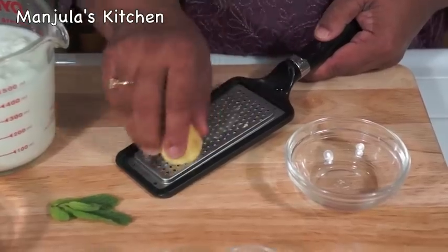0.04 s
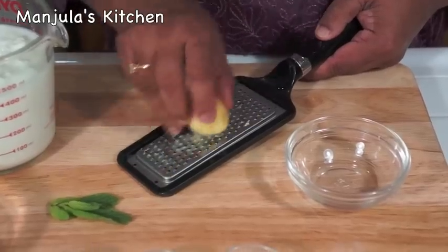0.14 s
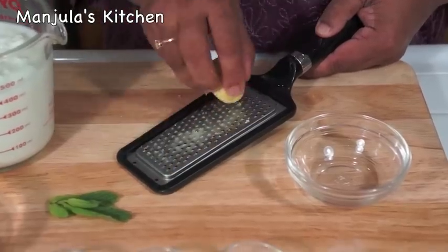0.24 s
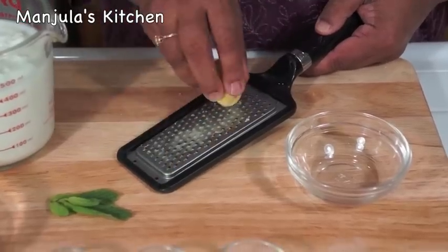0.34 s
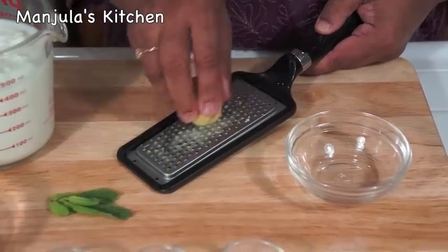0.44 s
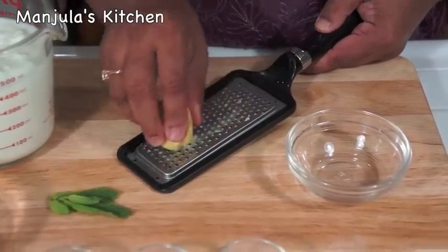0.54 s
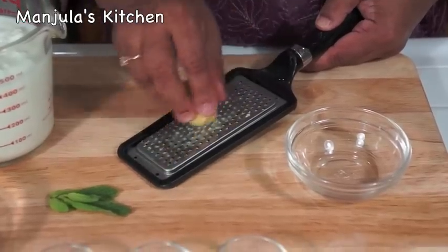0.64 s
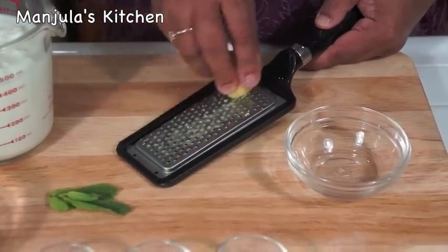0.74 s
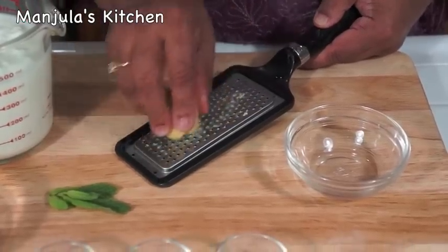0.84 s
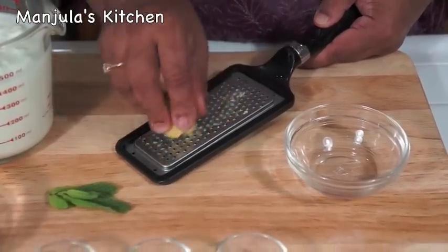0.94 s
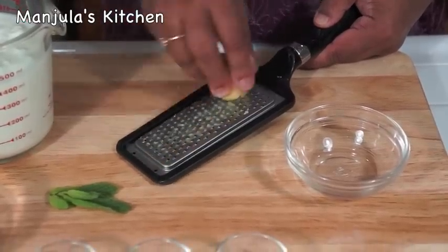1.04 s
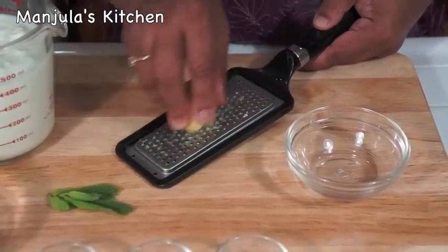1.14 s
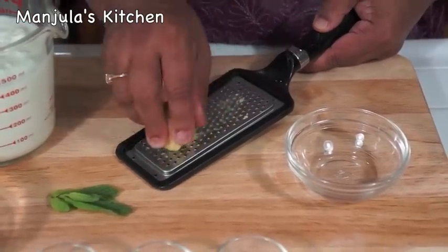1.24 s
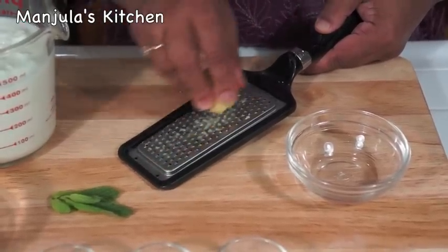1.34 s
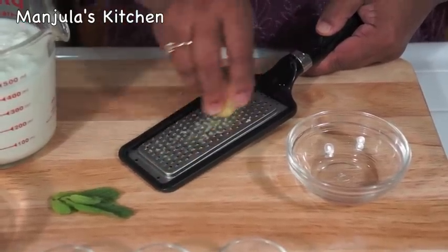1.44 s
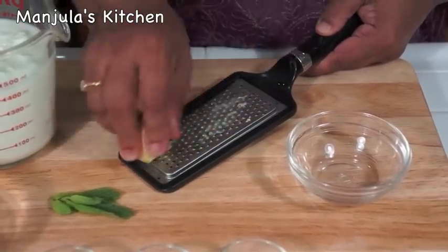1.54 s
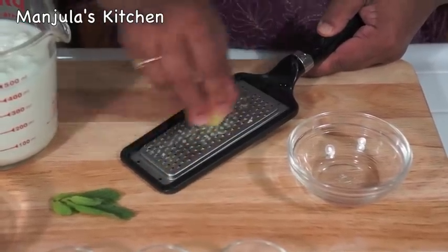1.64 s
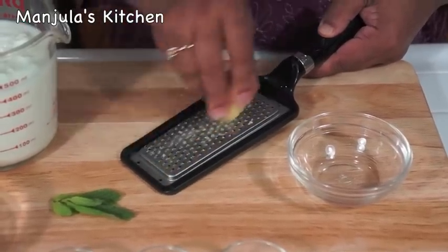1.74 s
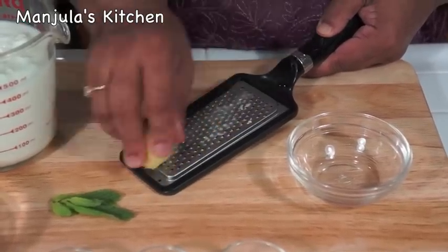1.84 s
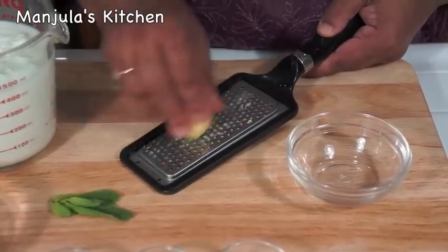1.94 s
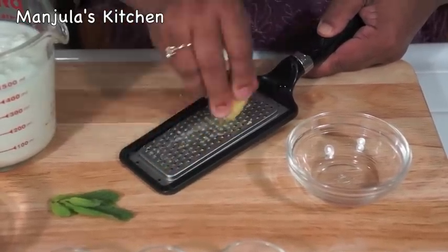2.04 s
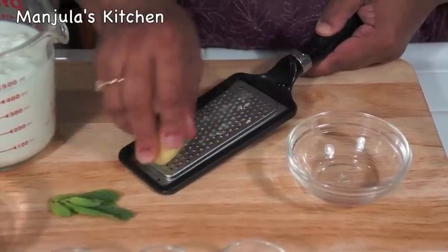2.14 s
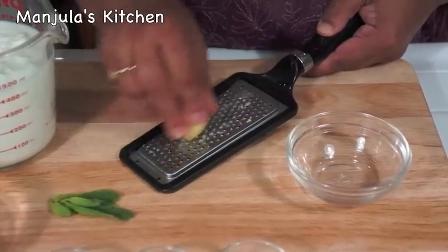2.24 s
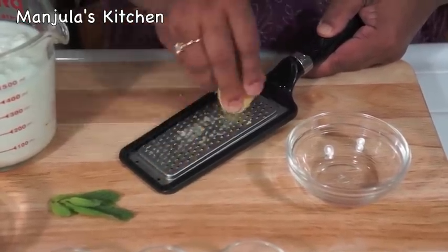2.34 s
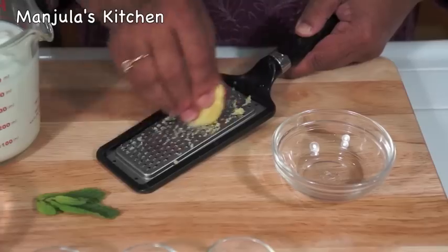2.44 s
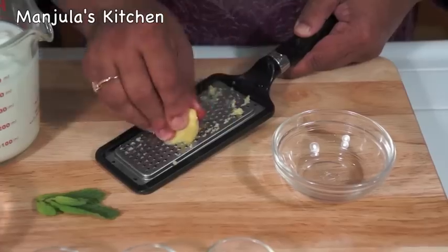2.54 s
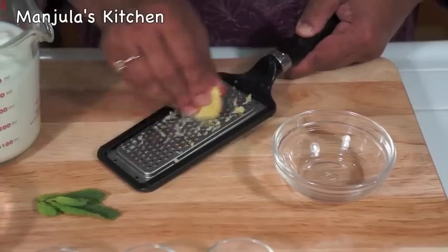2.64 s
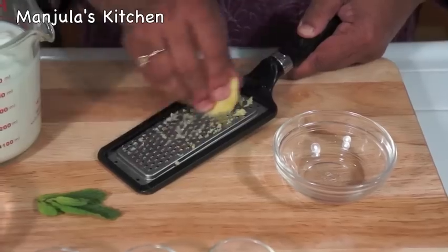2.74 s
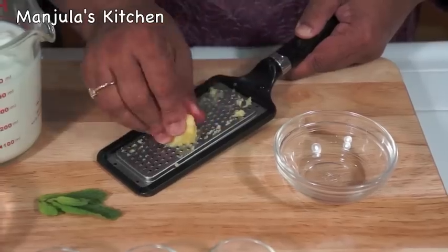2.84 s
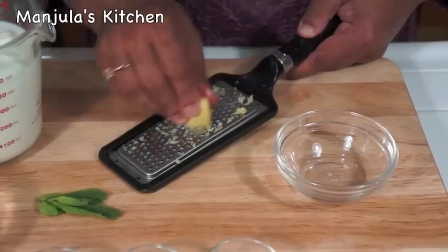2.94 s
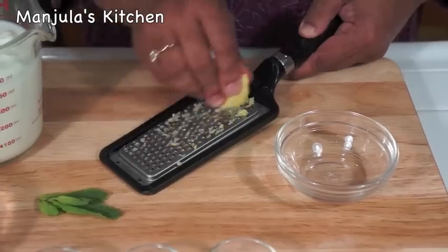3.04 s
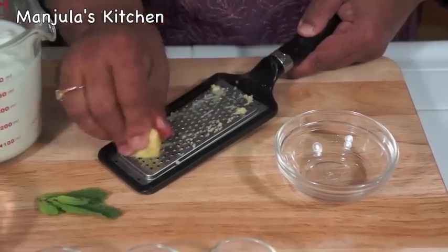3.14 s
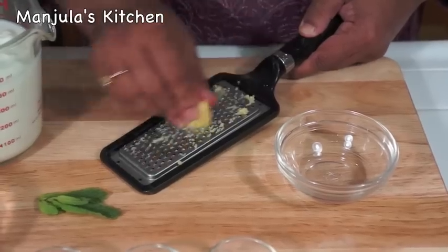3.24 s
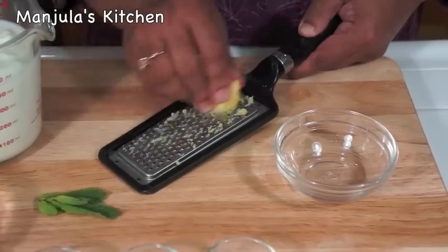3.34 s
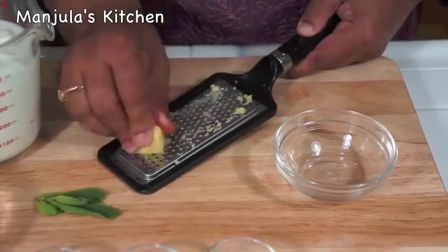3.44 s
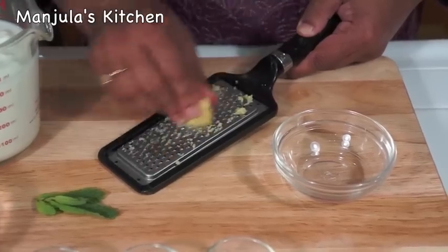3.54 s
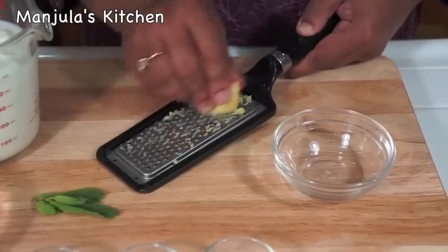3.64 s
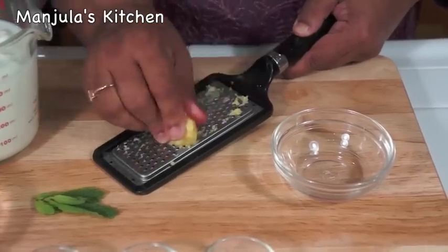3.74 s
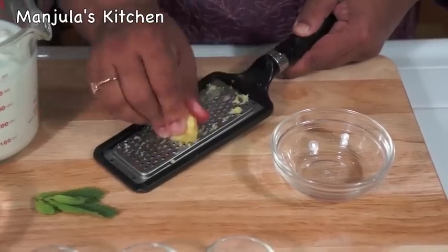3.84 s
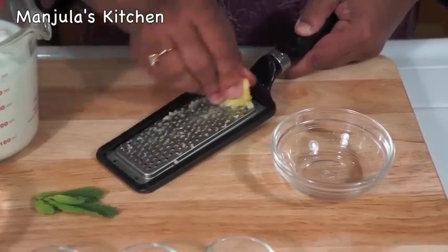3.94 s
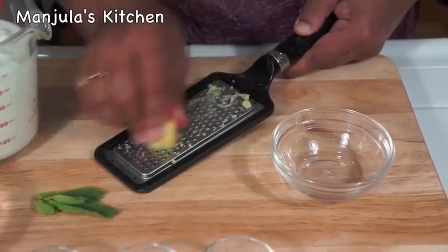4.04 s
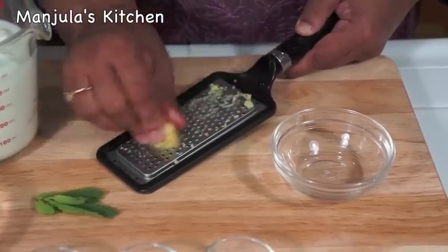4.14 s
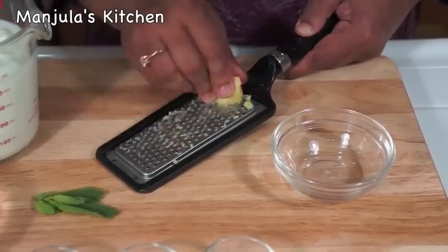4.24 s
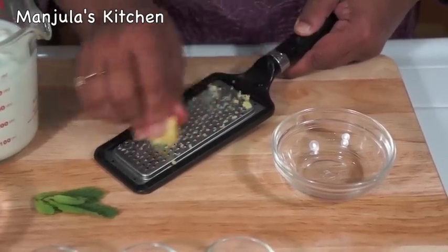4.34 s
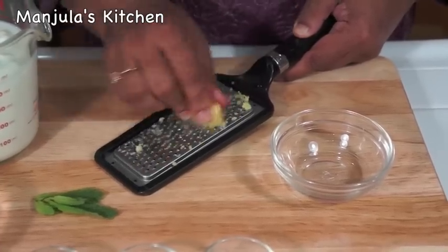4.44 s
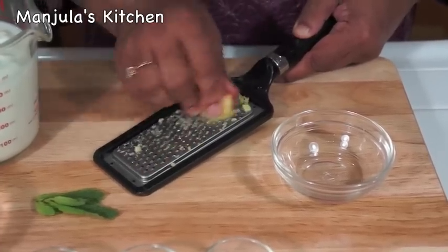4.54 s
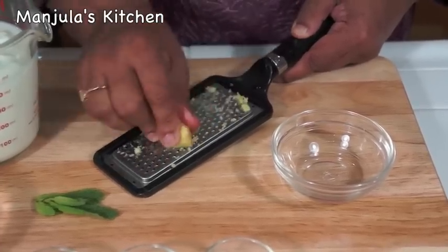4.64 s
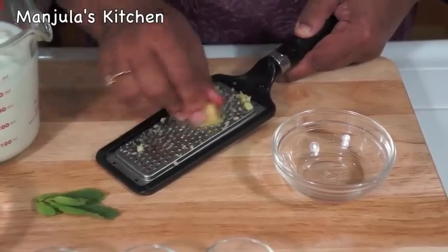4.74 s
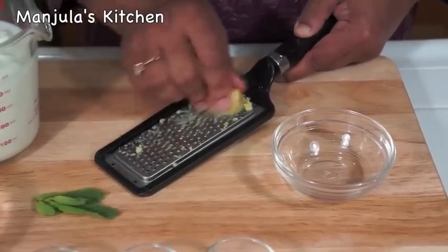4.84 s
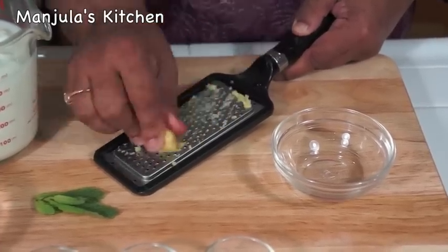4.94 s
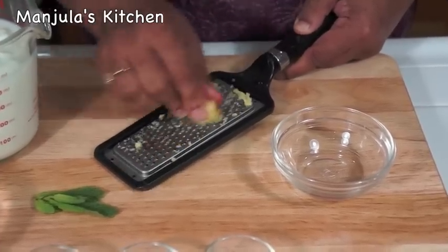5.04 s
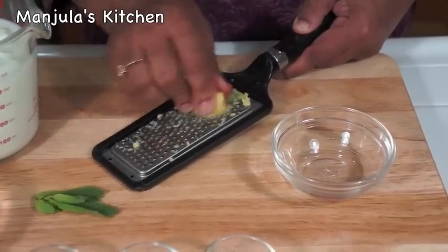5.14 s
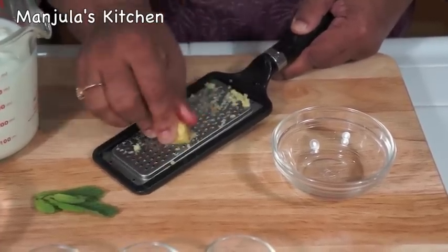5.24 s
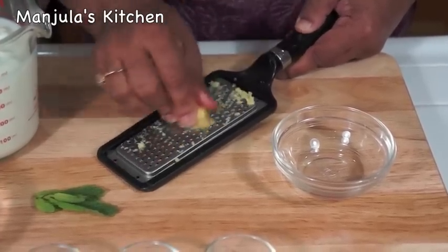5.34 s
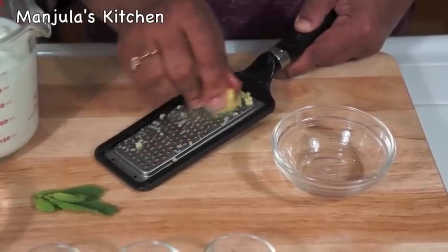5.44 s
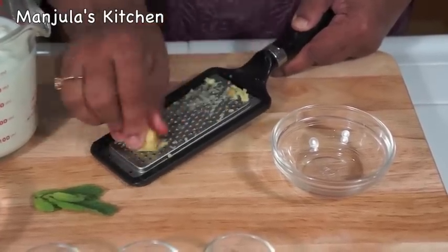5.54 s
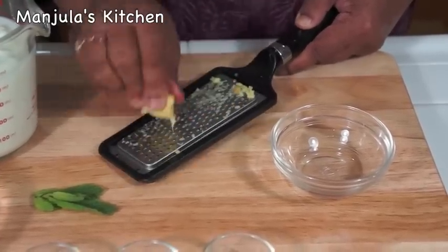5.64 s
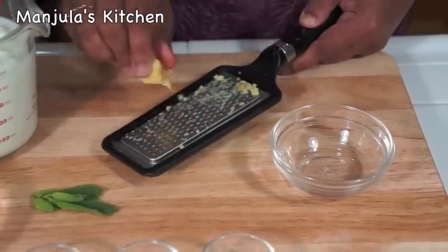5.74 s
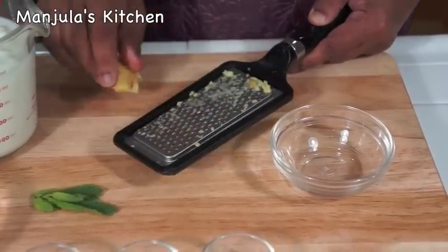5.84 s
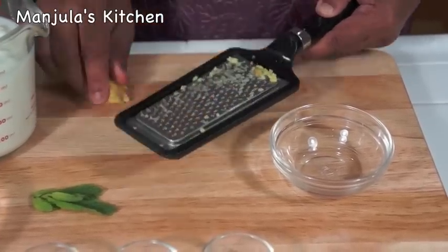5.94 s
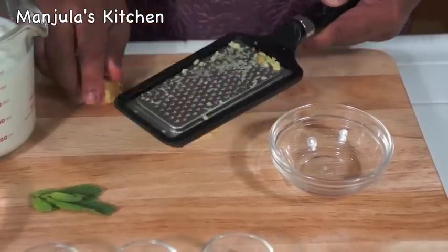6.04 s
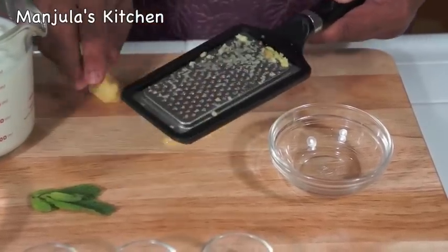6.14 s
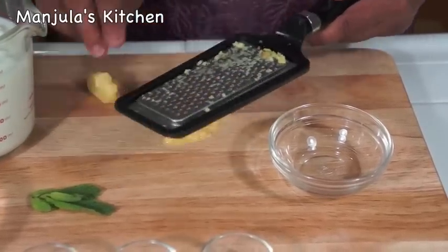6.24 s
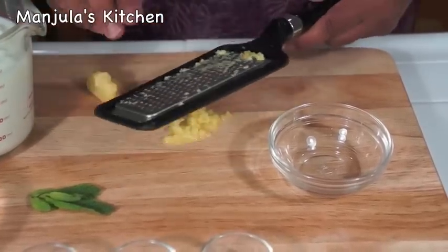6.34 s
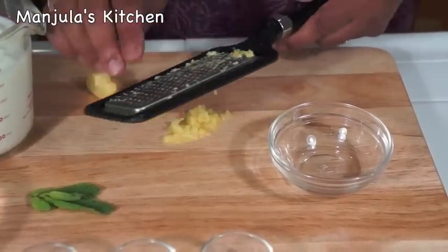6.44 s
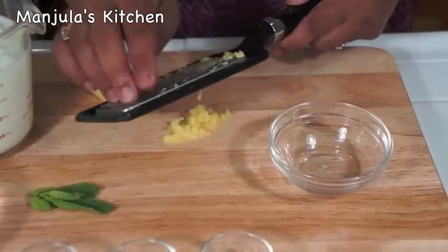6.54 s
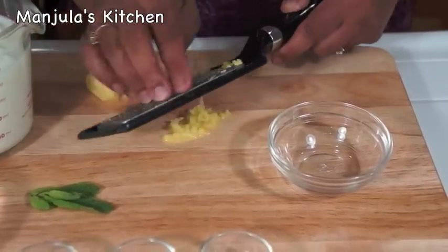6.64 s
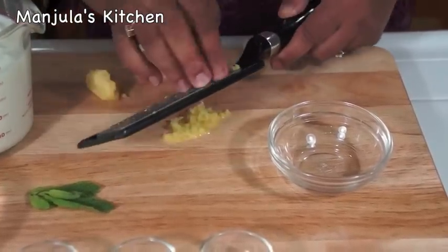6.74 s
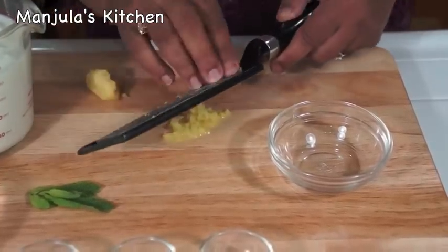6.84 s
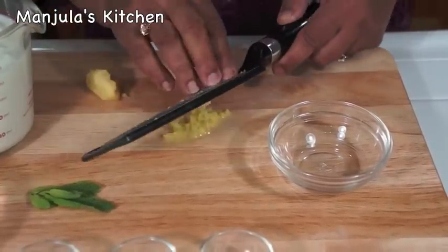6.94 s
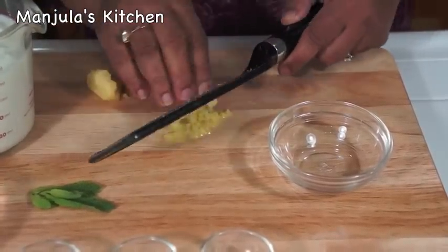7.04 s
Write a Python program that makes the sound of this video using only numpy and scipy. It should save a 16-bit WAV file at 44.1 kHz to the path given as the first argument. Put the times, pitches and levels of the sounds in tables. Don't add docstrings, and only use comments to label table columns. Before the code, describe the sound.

Brisk, bright metallic scrapes of a fibrous root on a fine grater, about three pushes a second, ending in a clatter, soft bumps and finger ticks.

```python
import sys
import numpy as np
from scipy import signal
from scipy.fft import rfft, irfft, next_fast_len
from scipy.io import wavfile
from scipy.ndimage import uniform_filter1d

SR = 44100
rng = np.random.default_rng(int(sys.argv[2]) if len(sys.argv) > 2 else 0)


def boost(x):
    u = np.asarray(x, float) / 20
    return 10 ** u


def file_out(sig):
    cols = np.atleast_2d(sig).T
    lim = np.clip(cols, -1, 1)
    pcm = np.round(lim * 32767).astype(np.int16)
    wavfile.write(sys.argv[1], SR, pcm)


N = 312326
T = np.arange(N) / SR
MIC_SIGNS = np.array([[1], [-1]])

# hz, width_hz, level_db
FRAME = [(436, 73, -15.5), (504.7, 14.6, -3.5), (622, 17, -16.5), (711, 26, -5), (731, 12, -3.5),
         (823, 22.6, 0.5), (900, 12, -10.5), (991, 38, -6)]
# hz, width_hz, level_db
HANDLE = [(1100, 22, 1.5), (1198, 56, 0), (1285, 82, 3.5), (1374, 82, 4), (1466, 29, -2), (1700, 100, -17)]
# centre_s, half_length_s, depth_db
JOINS = [
    (2.486, 0.078, -21),
    (4.457, 0.11, -28.5),
]
# start_s, tearing_db
LANDINGS = [
    (0.069, -37),
    (1.42, -28.5),
    (2.031, -29),
    (2.328, -29),
    (5.518, -31.5),
]


def level(x, db):
    return x * boost(db) / np.sqrt(np.mean(x ** 2))


def colour(x, points):
    hz, db = np.transpose(points)
    size = next_fast_len(N)
    f = np.maximum(np.arange(size // 2 + 1) * SR / size, 1)
    gain = boost(np.interp(np.log(f), np.log(hz), db))
    return irfft(rfft(x, size) * gain, size)[..., :N]


def band(x, lo_hz, hi_hz):
    sos = signal.butter(2, [lo_hz, min(hi_hz, SR / 2.2)], "band", fs=SR, output="sos")
    return signal.sosfilt(sos, x)


def walk(rate_hz, every=1):
    knots = rng.standard_normal(int(T[-1] * rate_hz) + 2)
    return np.interp(T[::every] * rate_hz, np.arange(len(knots)), knots) * 5 / 4


def ring(x, modes, shift_db=0., rate_hz=1, press_db=None):
    out = 0
    for k, (hz, width_hz, db) in enumerate(modes):
        gain = boost(db)
        if shift_db:
            press = 0 if press_db is None else press_db[k]
            gain = np.repeat(boost(db + shift_db * walk(rate_hz, 16) + press), 16)[:N]
        r = np.exp(-np.pi * width_hz / SR)
        poles = [1, -2 * r * np.cos(2 * np.pi * hz / SR), r * r]
        out = out + (-1) ** k * (1 - r) * signal.lfilter([1, 0, -1], poles, x * gain)
    return out


def fibres(share, spread_db, judder_db, judder_hz):
    size_db = spread_db * rng.exponential(size=N).clip(0, 6)
    snaps = (rng.random(N) < share) * rng.standard_normal(N) * boost(size_db)
    return level(snaps * boost(judder_db * walk(judder_hz)), 0)


def bursts(times_s, peaks_db, decay_s, rise_s, hz=None):
    out, age = np.zeros(N + 6000), np.arange(6000) / SR
    for k, (s, db) in enumerate(zip(times_s, peaks_db)):
        shape = boost(db) * (1 - np.exp(-age / rise_s)) * np.exp(-age / decay_s)
        if hz is not None:
            shape = shape * np.sin(2 * np.pi * hz[k] * age)
        out[int(s * SR):int(s * SR) + 6000] += shape
    return out[:N]


def strokes(start_s, rise_s, hold_s, db, fall_db_s, onset, sag_db_s=0.):
    age = T[::32, None] - start_s
    held = np.clip(age - rise_s, 0, None)
    fall_db = sag_db_s * held + fall_db_s * np.clip(held - hold_s, 0, None)
    shape = np.clip(age / rise_s, 0, 1) ** onset * boost(db - fall_db)
    return np.interp(T, T[::32], np.sum(shape ** 2, axis=1))


def in_db(power):
    return 10 * np.log10(power + 1e-13)


def kitchen(tear_db):
    # hz, density_db
    hush_points = [(15, -45), (25, -30), (64, -25), (125, -11), (158, -15), (307, -2.5), (511, -5),
                   (945, -6), (1580, -7.5), (4270, -13), (5250, -13.5), (9450, -13.5), (11300, -24),
                   (14700, -58), (22000, -120)]
    # hz, drift_hz, flutter_hz, level_db, end_s
    whines = [
        (9630, 51, 60, -75.5, 7.4),
        (4300, 24, 100, -72, 6.4),
    ]
    # time_s, level_db, offset_hz
    whine_swell = [(0, 1, 0.5), (1.2, 4, 5.5), (5.72, 3, 60.5), (5.799, 3, -120), (5.86, -7, 1),
                   (5.92, 1, 99), (6.0, 0, -40), (6.06, -14, -4), (6.14, 3, 40), (6.22, -5, -30),
                   (6.3, -4, -62), (6.4, -2, 60)]

    mid, side = (colour(rng.standard_normal(N), hush_points) for _ in range(2))
    apart = 0.39 * side + 0.36 * band(side, 510, 18000)
    out = level(mid + apart * MIC_SIGNS, -66)

    s, db = np.transpose(LANDINGS[1:4])
    out = out + bursts(s, db - 36, 0.019, 0.0037, np.full(len(s), 75))
    push_db = uniform_filter1d(tear_db.clip(-70), int(0.059 * SR))
    out = out + level(band(rng.standard_normal(N), 63, 165), -65.5) * boost(0.41 * push_db)

    s, swell_db, off_hz = np.transpose(whine_swell)
    for hz, drift_hz, flutter_hz, db, end_s in whines:
        lower = hz < 5000
        pitch_hz = hz + lower * np.interp(T, s, off_hz) + drift_hz * walk(6.2) + flutter_hz * walk(600)
        whine = np.sin(2 * np.pi * np.cumsum(pitch_hz) / SR)
        whine_db = db + 1.7 * walk(17) - 40 * np.clip(T - end_s, 0, None)
        out = out + whine * boost(whine_db + lower * np.interp(T, s, swell_db))
    return out


def walls(x, t60_s, treble_db):
    age = np.arange(SR // 2) / SR
    echo = boost(-60 * age / t60_s) * (age > .003) * rng.standard_normal((2, len(age)))
    echo = echo.mean(axis=0) + boost(treble_db) * band(echo, 730, 16500)
    return signal.fftconvolve(x[None], echo, axes=1)[:, :N]


def set_down():
    # start_s, peak_db, pitch_hz, click_rel_db
    bump_table = [(5.95, -66, 400, -8), (5.967, -51, 540, -20), (5.979, -60, 566, 4), (6.005, -65, 622, 5),
                  (6.04, -64, 380, -16), (6.07, -67, 610, -8), (6.137, -57, 606, -11),
                  (6.147, -63, 480, -8), (6.164, -66, 645, -13), (6.209, -65, 400, -8),
                  (6.285, -72, 1100, 0)]
    noise = rng.standard_normal((2, N))
    s, db, hz, click_db = np.transpose(bump_table)
    click = bursts(s, db + click_db + 11, 0.0068, .0004) * band(noise[1], 1000, 1600)
    knock = bursts(s, db + 2.0, 0.017, 0.0006, hz) + bursts(s, db - 4, 0.012, 0.0015, hz * 0.78)
    wood = bursts(s, db + 10.5, 0.022, 0.0012) * band(noise[0], 300, 640)
    return click + knock + wood


def wiping():
    # start_s, rise_s, hold_s, level_db, low_rel_db
    wipe_table = [(6.36, .08, .01, -68, -7), (6.635, 0.027, .01, -68, -3), (6.688, .006, 0.017, -66, 2),
                  (6.74, .008, .01, -63.5, -3), (6.886, 0.0063, .004, -58, -3),
                  (6.935, .003, .003, -53, -12), (6.953, .003, .012, -51, -10),
                  (6.97, .004, 0.026, -61, -0.5), (7.005, 0.022, 0.018, -55, -12),
                  (7.035, 0.0037, 0.012, -52.5, -23), (7.055, .01, .03, -65, -18)]
    s, rise, hold, db, low_db = np.transpose(wipe_table)
    slide_db, low_db = (in_db(strokes(s, rise, hold, d, 258, 1.2)) for d in (db, db + low_db))
    return slide_db, low_db - slide_db


def fingers():
    # start_s, peak_db, low_rel_db, ring_hz, low_ring_hz
    tick_table = [(6.6927, -53, -2, 4700, 1600), (6.6958, -48.5, -7, 5070, 1950),
                  (6.701, -61, 2, 3180, 1900), (6.722, -60, -20, 5100, 1900), (6.735, -54, -12, 7050, 2550),
                  (6.7401, -53, 6, 5150, 2550), (6.743, -53, 2, 3820, 1140), (6.898, -55, -8, 9000, 1820),
                  (6.992, -54, -14, 7000, 1900), (6.8912, -45, -16, 6400, 1790),
                  (6.94, -42, -18, 7040, 2700), (6.9472, -46, -22, 8500, 2370),
                  (6.958, -42.5, -11, 6700, 1760), (6.965, -49, -11, 6850, 1900),
                  (6.986, -41, -3, 7100, 1830), (7.0437, -52, 0, 8600, 3560)]
    # hz, width_hz, level_db
    lifted = [(1830, 70, 2), (2550, 81, 2), (5150, 120, -4), (6400, 91, 0), (7050, 140, -9),
              (7400, 130, -1), (8400, 280, -2), (8900, 120, -12)]
    noise = rng.standard_normal((2, N))
    s, db, low_db, hz, low_hz = np.transpose(tick_table)
    ticks = bursts(s, db + 8.5, 0.00091, .0001) * band(noise[1], 1900, 7800)
    ticks = ticks + bursts(s, db - 4.5, 0.0038, .0002, hz)
    ticks = ticks + bursts(s, db + low_db - 4, 0.0091, 0.00036, low_hz) * (.9 + 0.3 * walk(400))
    ticks = ticks + ring(bursts(s, db, 0.0013, .0002) * noise[0], lifted)
    ticks = ticks + bursts([7.043], [-36], .03, .002) * band(noise[1], 6000, 6350)
    ticks = ticks + bursts([6.72, 6.739], [-59, -56], 0.0069, 0.0018, [5100, 5150])

    slide_db, low_db = wiping()
    skin = fibres(0.37, 1.5, 2.4, 100)
    bright = level(ring(skin, lifted[2:], 3.5, 25), -9) + level(band(skin, 5900, 8700), -1.5)
    low = level(band(skin, 1070, 3600), -1.6) + level(ring(skin, lifted[:2]), -2.6)
    return ticks + boost(slide_db) * (bright + boost(low_db) * low)


def rattles():
    # start_s, peak_db, click_rel_db, clack_hz, tail_rel_db
    rattle_table = [(5.616, -36, -2, 1230, -11), (5.6306, -25, -2, 1330, -14.5),
                    (5.647, -40, -11, 1390, -12), (5.668, -45, -9, 1356, -19), (5.683, -46, -6, 1340, -18),
                    (5.703, -45, -6, 1405, -12), (5.737, -46, -8, 1330, -11), (5.756, -47, -14, 1290, -19),
                    (5.804, -49, -5, 1000, -10), (5.812, -50, -8, 1350, -9.5)]
    s, db, click_db, hz, tail_db = np.transpose(rattle_table)
    noise = rng.standard_normal((2, N))
    clack = bursts(s - .001, db + 5, 0.0022, 0.00088, hz)
    click = bursts(s - .001, db + click_db + 6.5, 0.0032, 0.00042)
    click = click * band(band(noise[0], 470, 2300), 300, 3300)
    tail = bursts(s, db + tail_db, 0.025, 0.0036) * noise[1] * boost(2.8 * walk(90))
    wood = boost(5.0) * band(tail, 1350, 1500) + boost(11.5) * band(tail, 570, 820) + band(tail, 1750, 2500)
    return clack + click + wood


def knocks():
    # peak_s, peak_db, crack_rel_db, thud_hz, ping_hz
    knock_table = [(0.0702, -23, -2, 1307, 8500), (0.078, -31, -16, 987, 8700), (0.396, -59, 6, 1290, 7200),
                   (0.439, -35, 4.5, 1440, 6760), (0.707, -55, 4, 1100, 7160), (0.788, -47, 5, 991, 7260),
                   (1.057, -61, 16, 1130, 8500), (1.107, -30.5, 0.5, 1350, 7700),
                   (1.421, -28, 13, 1240, 6600), (1.696, -35.5, 2, 1296, 6440),
                   (2.033, -25.5, 11, 1290, 6600), (2.331, -21, 8, 1266, 6640), (2.742, -52, 18, 770, 7900),
                   (2.504, -43, 1, 790, 6450), (3.068, -51, -6, 1190, 6500), (3.366, -46, 6, 800, 4900),
                   (3.645, -51, -14, 540, 6500), (3.972, -47.5, -8, 974, 6500), (4.304, -42, 9, 726, 7900),
                   (4.481, -46, 9, 800, 6500), (4.551, -40.5, -6, 705, 6500),
                   (5.518, -33.5, 13, 1010, 4950)]
    s, db, crack_db, hz, ping_hz = np.transpose(knock_table)
    s = s - .0004
    crack_db = db + crack_db
    noise = rng.standard_normal((2, N))
    thud = bursts(s, db + 3.0, 0.0065, 0.00082, hz)
    thud = thud + bursts(s, db - 5, .007, .0015, np.full(len(s), 790))
    frame = ring(bursts(s, db + 12, 0.002, 0.00023) * noise[0], FRAME + HANDLE)
    crack = bursts(s, crack_db + 2.5, 0.0018, 0.00031) * band(noise[1], 1940, 5800)
    ping = bursts(s + 0.00073, crack_db + 10, 0.00072, 0.0005, ping_hz)
    ping = ping + bursts(s + .0015, crack_db - 4.0, 0.0014, 0.00086, ping_hz * 1.19)
    ping = ping + bursts(s, crack_db - 9.0, 0.0034, 0.0012, np.full(len(s), 3480))
    ping = ping + bursts(s, crack_db - 12, 0.0044, .0005, np.full(len(s), 4990))
    graze = bursts(s - .006, crack_db - 10, 0.0016, 0.0025) * band(noise[0], 5300, 10600)
    return graze + thud + frame + crack + ping


def catches():
    # start_s, peak_db, pitch_hz
    pluck_table = [(0.034, -32, 2870), (0.487, -30, 2874), (0.52, -41, 3400), (0.731, -48, 2440),
                   (0.824, -35, 2850), (0.843, -36, 3000), (1.156, -35, 2480), (1.529, -30.5, 2777),
                   (1.705, -41, 2465), (1.831, -33, 2650), (1.855, -30.5, 2616), (2.188, -46, 2570),
                   (2.797, -30, 2410), (2.815, -31, 2594), (3.007, -37, 2600), (3.09, -31, 2960),
                   (3.122, -27, 2605), (3.404, -37, 2476), (3.712, -29.5, 3165), (3.971, -41, 2460),
                   (4.06, -37, 2730), (4.088, -31, 2616), (4.345, -32, 2360), (4.368, -31, 2480),
                   (4.616, -30, 2630), (4.885, -28, 2580), (4.916, -29, 3000), (4.944, -29, 3110),
                   (5.176, -34, 2490), (5.245, -39, 2520), (5.414, -39, 3356), (5.48, -31.5, 2520)]
    # start_s, peak_db, pitch_hz
    jolt_table = [(0.531, -44, 1388), (1.166, -36, 777), (1.507, -30, 1054), (1.527, -31, 997),
                  (1.709, -37, 1236), (1.785, -33, 815), (2.124, -27, 810), (2.408, -33, 752),
                  (2.794, -30, 835), (2.821, -28, 1323), (3.119, -38, 1431), (3.573, -40, 1327),
                  (3.715, -35, 839), (4.072, -31, 1296), (4.088, -37, 730), (4.336, -36, 787),
                  (4.361, -37.5, 814), (4.614, -32, 810), (4.913, -32, 820), (5.214, -36, 742)]
    s, db, hz = np.transpose(pluck_table)
    plate = bursts(s - .001, db + 3, .006, 0.0019, hz)
    s, db, hz = np.transpose(jolt_table)
    body = bursts(s - .003, db + 2.5, .011, 0.0027, hz)
    squeak = bursts([.392, .41], [-36, -35], .025, 0.0036)
    squeak = squeak * band(band(rng.standard_normal(N), 6800, 7200), 6900, 7400)
    return plate + body + squeak


def rubbing():
    # start_s, rise_s, hold_s, tearing_db, plate_rel_db
    pushes = [(-.05, 0.023, 0.078, -34.5, -2), (0.391, 0.064, 0.082, -37.5, 1.5),
              (0.763, 0.059, 0.044, -34, -2.5), (1.094, 0.039, 0.073, -35, -3.5),
              (1.426, 0.019, 0.11, -34, -3), (1.741, 0.038, 0.064, -33.5, -5.5),
              (2.037, 0.048, 0.083, -34.5, -4), (2.331, 0.015, 0.082, -36, -6),
              (2.48, 0.019, 0.059, -46, -1.5), (2.733, 0.056, 0.024, -29, -6),
              (3.055, 0.044, 0.056, -31, -2), (3.344, 0.046, 0.052, -32, -3),
              (3.643, 0.05, 0.031, -30.5, -5), (3.994, 0.049, 0.052, -32, -7), (4.283, 0.05, 0.03, -32, -3),
              (4.55, 0.036, 0.039, -33, -3), (4.845, 0.041, 0.047, -30, -3),
              (5.136, 0.039, 0.055, -32, -3.5), (5.453, 0.038, 0.058, -33, -5)]
    # full_s, hold_s, tearing_db
    bites = [(0.45, .02, -53), (0.791, 0.027, -39.5), (2.763, .015, -42.5), (3.084, 0.022, -35.5),
             (3.362, .02, -37.5), (3.664, 0.022, -35.5), (4.012, 0.014, -38.5), (4.303, 0.02, -37.5),
             (4.551, .01, -43), (4.567, 0.0094, -35.5), (4.608, .012, -34.5), (4.88, .02, -44),
             (5.162, 0.029, -51), (5.475, 0.014, -43)]
    # start_s, rise_s, hold_s, frame_db, handle_db
    loads = [(-.02, 0.019, 0.056, -35, -39), (0.065, 0.0033, 0.015, -41, -43),
             (0.433, 0.0044, 0.1, -41.5, -43), (0.791, 0.022, 0.063, -39.5, -39.5),
             (1.104, 0.0049, 0.099, -38.5, -39.5), (1.426, 0.017, 0.11, -36, -39),
             (1.688, .012, 0.0071, -43, -48.5), (1.749, 0.031, 0.072, -38.5, -40),
             (2.031, 0.0084, 0.12, -38.5, -39), (2.329, 0.007, 0.074, -37.5, -42.5),
             (2.492, 0.013, 0.072, -47.5, -48.5), (2.739, 0.057, 0.021, -33, -36.5),
             (3.065, 0.042, 0.04, -38, -37), (3.349, 0.035, 0.061, -37.5, -39.5),
             (3.646, 0.053, 0.02, -36.5, -39.5), (3.993, 0.085, 0.016, -37.5, -39),
             (4.281, 0.058, 0.017, -39.5, -41.5), (4.545, 0.046, 0.014, -40, -43.5),
             (4.872, 0.017, 0.03, -38, -42), (5.179, 0.022, 0.012, -42, -44),
             (5.486, 0.034, 0.022, -40, -44), (5.633, 0.0065, .004, -52, -49)]
    # start_s, rise_s, tearing_db, plate_rel_db, frame_rel_db
    returns = [(0.704, 0.023, -47.5, -4, -11), (1.048, 0.013, -51.5, -14, -24),
               (1.685, 0.018, -45, 4.5, -5), (2.58, 0.12, -45, -4, -9.5), (2.92, 0.1, -42, -6.5, -10.5),
               (3.218, 0.084, -37.5, -4, -5.5), (3.517, 0.08, -40, 0, -7), (3.87, 0.098, -45.5, 0, -6),
               (4.158, 0.078, -37, -1, -6), (4.46, .055, -49.5, 4, -11), (4.712, 0.1, -41, -1.5, -12),
               (5.0, 0.1, -41, 0.5, -15), (5.32, .1, -45, -4.5, -11.5)]
    push_fall_db_s = np.array([182, 231, 228])
    load_fall_db_s = np.array([165, 151, 118])
    push_sag_db_s, load_sag_db_s, linger_fall_db_s, return_fall_db_s = 18, 16.5, 49, 397
    bite_rise_s = .0045

    def take(s):
        return np.searchsorted([join[0] for join in JOINS], s)

    s, rise, hold, db, plate_db = np.transpose(pushes)
    tear = strokes(s, rise, hold, db, push_fall_db_s[take(s)], 1.08, push_sag_db_s)
    tear = tear + strokes(s, rise + hold, 0, db - 23, linger_fall_db_s, 1)
    plate = strokes(s, rise, hold, db + plate_db, 153, 1.5, push_sag_db_s)

    s, hold, db = np.transpose(bites)
    tear = tear + strokes(s - bite_rise_s, bite_rise_s, hold, db, 420, 1)

    s, rise, hold, frame_db, handle_db = np.transpose(loads)

    def load(d):
        weight = strokes(s, rise, hold, d, load_fall_db_s[take(s)], 1.7, load_sag_db_s)
        touch = strokes(s, 0.0024, rise, d - 11, return_fall_db_s, 0.83)
        return weight + touch + strokes(s, rise + hold, 0, d - 22, linger_fall_db_s, 1)

    handle, frame = load(handle_db), load(frame_db)

    back_s, back_rise, db, plate_db, frame_db = np.transpose(returns)

    def drag(d):
        return strokes(back_s, back_rise, 0.0051, d, return_fall_db_s, 0.61)

    land_s, land_db = np.transpose(LANDINGS)
    landed = strokes(land_s, 0.0054, 0.00097, land_db, 1100, 1.0)
    snag = strokes(back_s + back_rise - .006, 0.0032, 0.0014, db - 25, 502, 1)
    tear_db = in_db(tear + drag(db) + landed + snag)
    plate = plate + drag(db + plate_db)
    handle = handle + drag(db + frame_db - 4)
    frame = frame + drag(db + frame_db) + landed * boost(2 * -2.5)
    return [tear_db] + [in_db(power) - tear_db for power in (plate, handle, frame)]


def flex(x):
    return np.interp(np.arange(N) + 7. * walk(18.), np.arange(N), x)


def rasp(tear_db, plate_db, handle_db, frame_db):
    tear_first = [(880, -20), (1500, -7.5), (2030, -7.5), (2850, -1.5), (3150, -6.5), (4100, -14),
                  (5020, 2), (5850, -3), (6520, 0.5), (9380, -0.5), (11300, -16.5), (14700, -43),
                  (22000, -120)]
    # hz, density_db
    tear_later = [(880, -53), (1500, -10), (1980, -10.5), (2390, -4), (2640, -1.5), (3770, -9.5),
                  (5020, -3), (5600, -4), (6050, 2), (7220, 0.5), (9300, -2.5), (10700, -10.5),
                  (11300, -21.5), (14700, -53), (22000, -120)]
    # hz, width_hz, level_db
    teeth_modes = [(4100, 200, -9.5), (4960, 190, 7), (5330, 84, -6), (6220, 70, 6.5), (6500, 116, -1.5),
                   (7450, 105, 12), (7470, 110, -9), (8500, 56, 6), (8840, 990, -11.5)]
    # hz, width_hz, level_db
    plate_modes = [(2240, 52, -3), (2298, 82, 2.5), (2470, 83, 9.5), (2560, 11, 0), (2777, 82, 7.5),
                   (2920, 38, 5), (2974, 36, 7.5), (3330, 88, -2), (3400, 120, 5.5)]
    # time_s, lowest_pair_db, low_trio_db, main_pair_db, upper_db
    press_table = [(.06, 0.5, 0.5, -1.5, 3.5), (.5, 1, -2, 2.5, 0), (.86, -2.5, -2.5, 1, 3),
                   (1.17, -1.5, 1.5, -0.5, 1.5), (1.5, 2.5, -1.5, -0.5, -1), (1.81, -1, 6.5, 1, 4),
                   (2.1, 0.5, 5.5, 4.5, -5.5), (2.38, -1.5, 8, -1, -5), (2.55, -3.5, -3, 5, -1.5),
                   (2.81, -1.5, -7.5, 3.5, -3), (3.12, 0.5, 5.5, 0, 2), (3.41, 3, -3.5, 3, -3.5),
                   (3.72, 3, 2, 3, -0.5), (4.08, 0, 0.5, -2.5, 0), (4.35, 1, 2, -3, 1),
                   (4.61, 3, -5, 5.5, 2), (4.9, 0, -3.5, -0.5, -1.5), (5.22, -4, 3.5, 2, 4),
                   (5.53, -1, 1.5, -6, 1), (5.7, 2, 3, -6, -4)]

    fine = fibres(0.3, 1.44, 1.09, 140)
    coarse = fibres(.15, 1.6, 1.53, 90)
    first = T < JOINS[0][0]
    tear = np.where(first, level(colour(fine, tear_first), 0), level(colour(fine, tear_later), 0))
    teeth = level(ring(fine, teeth_modes, 2.2, 14), -4.5)
    tear = tear + teeth * boost(0.5 * (T > JOINS[0][0]))

    plate = level(flex(ring(fine + 1.02 * coarse, plate_modes, 3.4, 16)), -7.0)
    plate = plate + level(band(fine, 1840, 4180), -12.5)
    handle = level(flex(ring(coarse, HANDLE, 2, 22.13)), -3.5) + level(band(coarse, 1123, 1705), -5.5)

    press = np.transpose(press_table)
    press_db = [np.interp(T[::16], press[0], press[k]) for k in (1, 1, 2, 2, 2, 3, 3, 4)]
    frame = level(flex(ring(coarse, FRAME, 2.5, 26, press_db)), -1.65)
    frame = frame + level(band(coarse, 445, 1095), -9.5)
    body = boost(plate_db) * plate + boost(handle_db) * handle + boost(frame_db) * frame
    return boost(tear_db) * (level(tear, 0.076) + body)


def scene():
    # hz, level_db
    right_points = [(300, 2), (1000, 0), (2500, 1.5), (5000, 0.5), (9000, 3.5)]
    # hz, level_db
    spread_points = [(300, -18.5), (800, -18.5), (1500, -13), (2500, -5.5), (5000, -4), (9000, -2)]
    rub = rubbing()
    hits = knocks() + rattles() + set_down() + fingers() + catches()
    grating = rasp(*rub)
    near = band(grating + hits, 373, 20000)
    late = np.roll(hits + 0.42 * grating, int(0.001247 * SR))
    apart = colour(0.99 * rasp(*rub) + late, spread_points)
    both = boost(-0.5) * (near + apart * MIC_SIGNS + boost(-39.5) * walls(near, 0.29, 0.46))
    lean = np.array(right_points) * [1, .5]
    left, right = colour(both[0], lean * [1, -1]), colour(both[1], lean)
    return np.array([left, right]) + kitchen(rub[0])


def low_pass(x):
    return signal.sosfilt(signal.butter(12, 12090, fs=SR, output="sos"), x)


def record(dry):
    fade_db = sum(db * np.clip(1 - abs(T - s) / half_s, 0, 1) ** 5.0 for s, half_s, db in JOINS)
    steep = signal.ellip(8, .3, 28, 11100, fs=SR, output="sos")
    top = np.vstack([steep, signal.butter(6, 12500, fs=SR, output="sos")])
    return low_pass(signal.sosfilt(top, dry * boost(fade_db)))


dry = scene()
out = record(dry)
file_out(out)
```